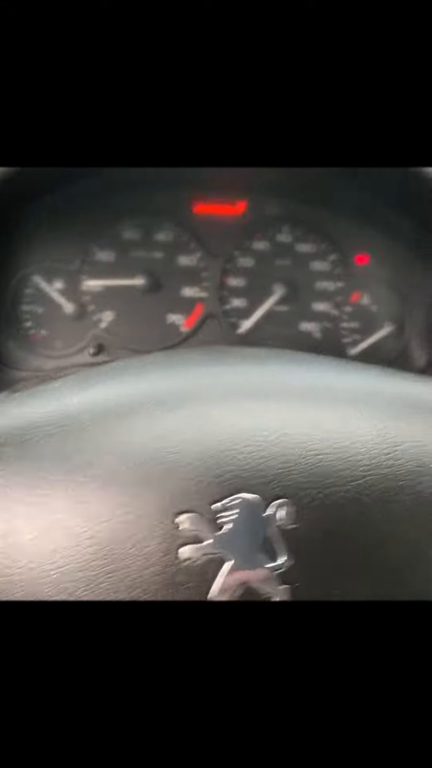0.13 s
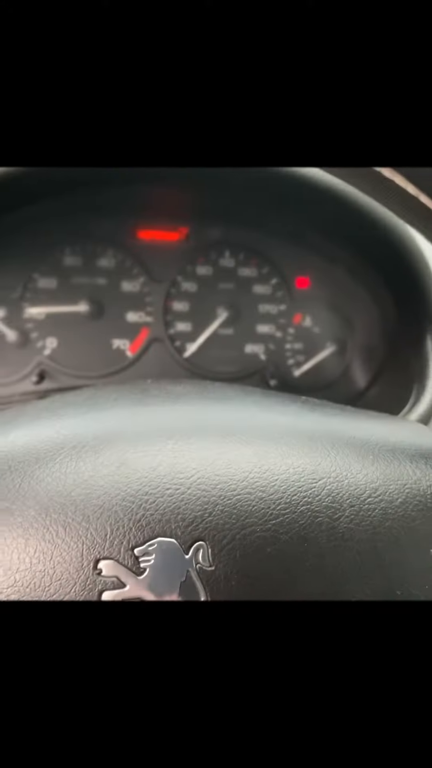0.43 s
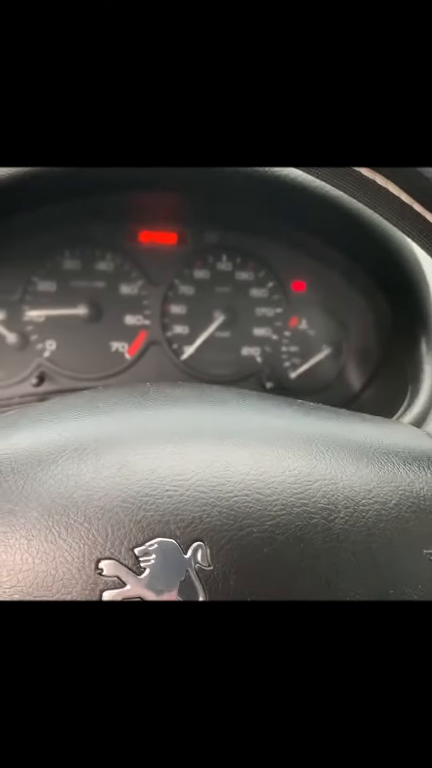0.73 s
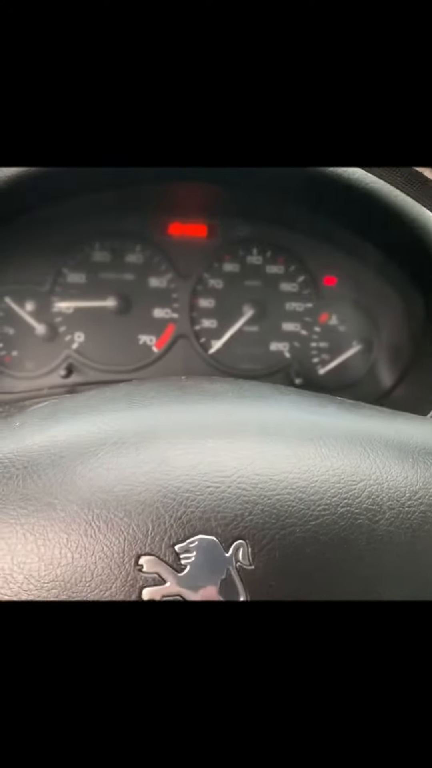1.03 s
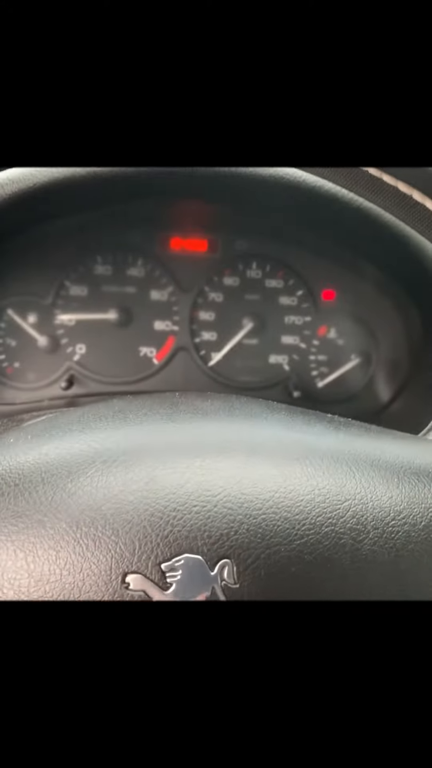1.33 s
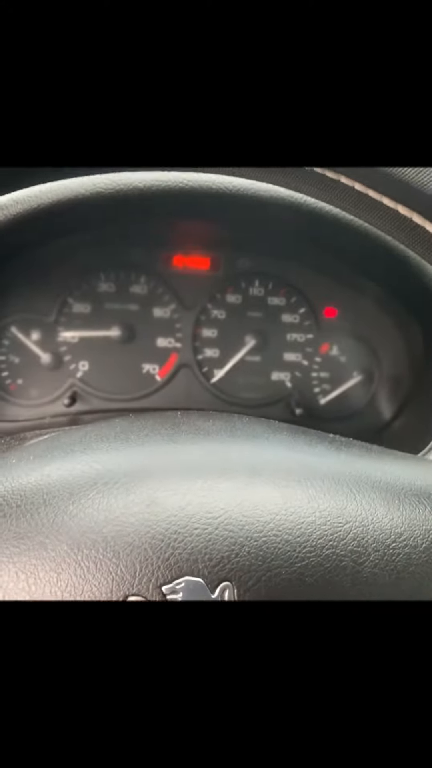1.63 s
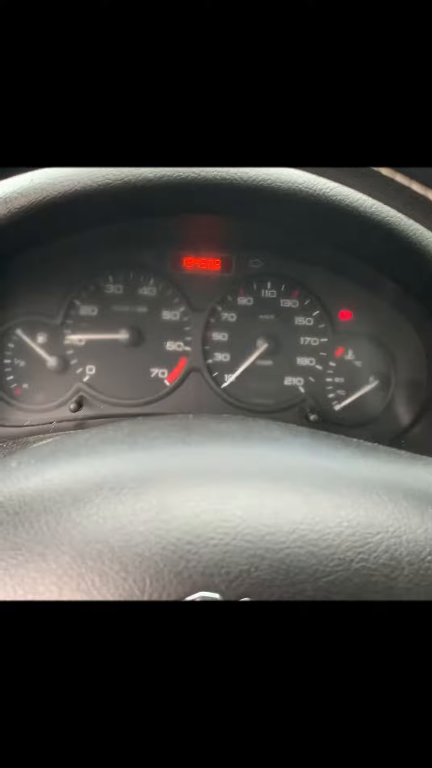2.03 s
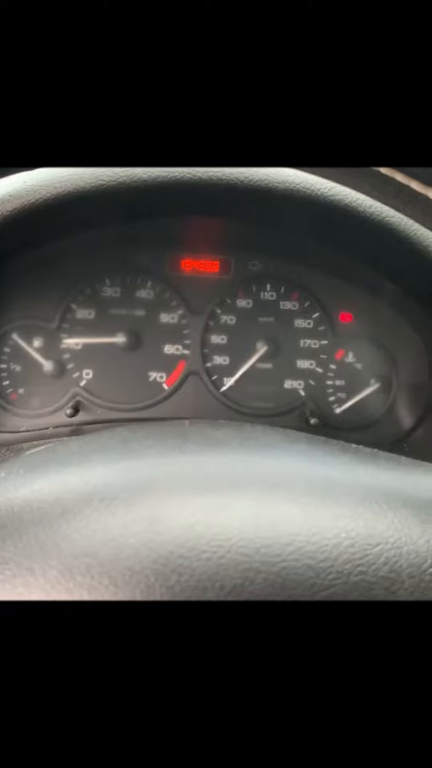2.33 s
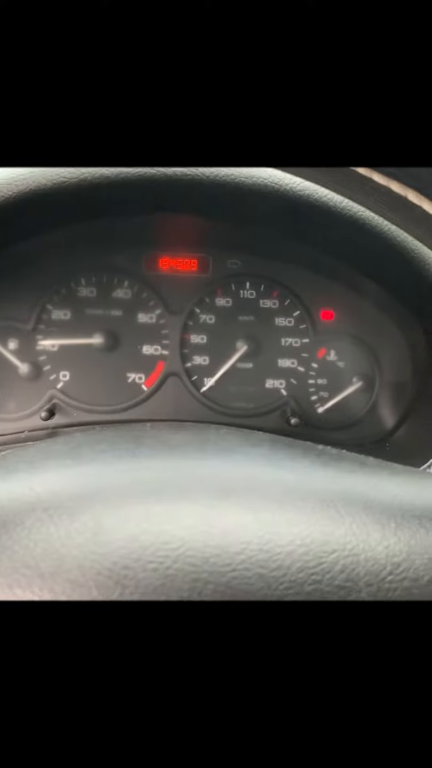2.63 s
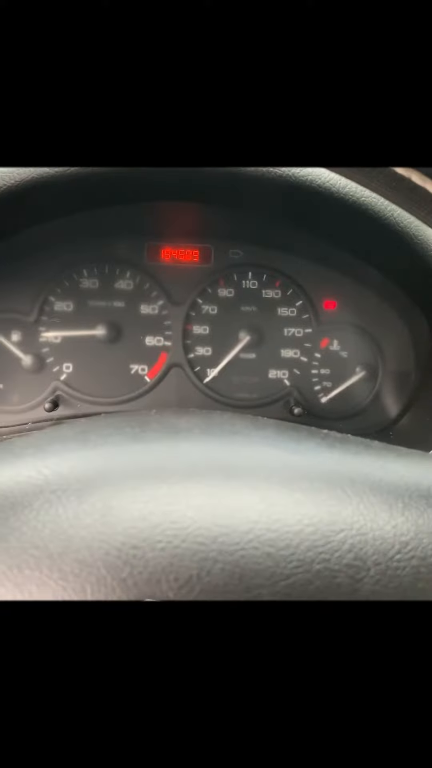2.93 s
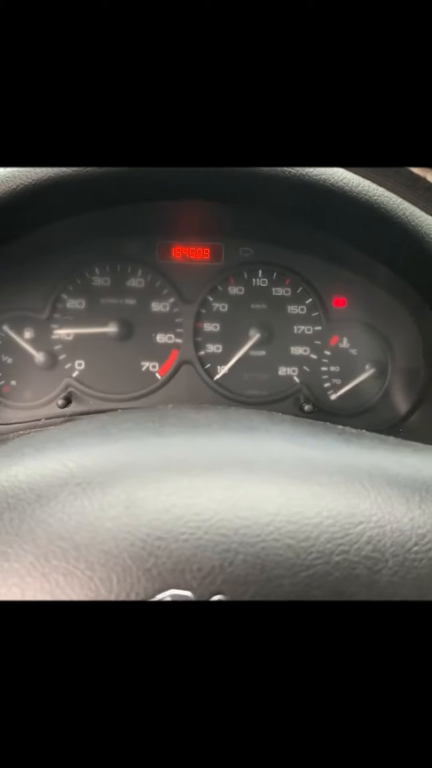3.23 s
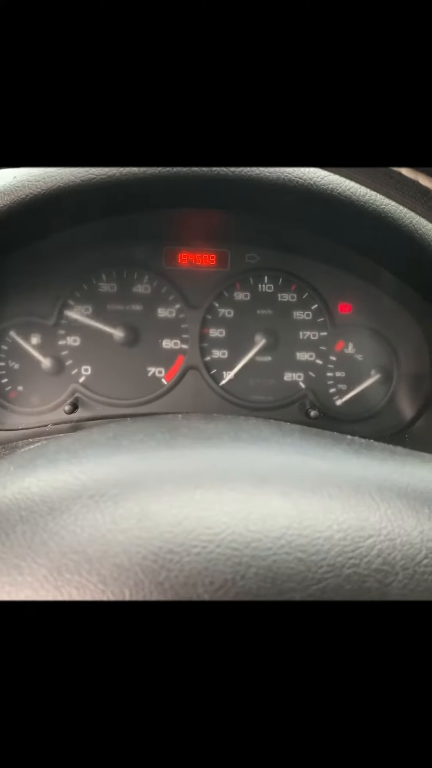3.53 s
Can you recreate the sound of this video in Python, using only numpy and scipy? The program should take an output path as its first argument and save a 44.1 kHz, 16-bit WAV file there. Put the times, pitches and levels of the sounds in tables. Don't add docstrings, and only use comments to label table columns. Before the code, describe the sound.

A car engine idles inside a closed cabin, a steady low hum with soft mechanical hiss and a thin, faint whine. A tiny sharp click comes at 0.45 s, a light tap at 1.1 s, and a dull pedal thump at 2.5 s, with small knocks and rubbing until 3.1 s. Then the revs leap, peaking around 3.4 s, and the much louder booming roar holds to the end at about 3.7 s.

```python
import sys
import numpy as np
from scipy import signal
from scipy.fft import rfft, irfft
from scipy.io import wavfile

SR = 44100
rng = np.random.default_rng(int(sys.argv[2]) if len(sys.argv) > 2 else 0)


def how_loud(loudness_db):
    steps = np.asarray(loudness_db, float) / 20
    return 10 ** steps


def unload_wav(signal):
    wavfile.write(
        sys.argv[1],
        SR,
        np.round(np.clip(np.atleast_2d(signal).T, -1, 1) * 32767).astype(np.int16),
    )


N = 161847
TIME_S = np.arange(N) / SR
MID_SIDE = np.array([[1], [-1]])


def rms_one(x):
    return x / np.sqrt(np.mean(x ** 2) + 1e-20)


def in_time(rows):
    time_s, *columns = np.transpose(rows)
    return [np.interp(TIME_S, time_s, column) for column in columns]


def at_hz(points, hz):
    table_hz, values = np.transpose(points)
    return np.interp(np.log(hz), np.log(table_hz), values)


def drift(rate_hz):
    r = np.exp(-80 * np.pi * rate_hz / SR)
    noise = rng.standard_normal(N // 40 + 2002)
    slow = signal.lfilter([1], [1, -2 * r, r * r], noise)[2000:]
    return np.interp(np.arange(N) / 40, np.arange(len(slow)), rms_one(slow))


def bump(at_s, length_s):
    return np.exp(-.5 * ((TIME_S - at_s) / length_s) ** 2)


def swells(rows):
    return sum(how_loud(db) * bump(at_s, length_s) for at_s, length_s, db in rows)


def resonate(x, hz, width_hz):
    r = np.exp(-np.pi * width_hz / SR)
    return signal.lfilter([(1 - r * r) / 2, 0, (r * r - 1) / 2],
                          [1, -2 * r * np.cos(2 * np.pi * hz / SR), r * r], x)


# (frequency [Hz], correlation [-1..1])
LIKENESS = [(60, 1), (200, 0.94), (400, 0.56), (900, 0.12), (2500, 0.21), (4000, 0.18), (6500, 1),
            (14000, 0.72)]
# (frequency [Hz], level [dB])
BALANCE = [(300, -0.5), (500, 1.5), (800, -3), (1300, -4), (1900, 1.5), (3000, -0.5)]
# (frequency [Hz], width [Hz], level [dB])
CABIN_MODES = [(640, 18, 3.5), (1254, 46, 6), (1460, 36, 3), (1726, 23, 4), (1820, 40, 0.5),
               (2000, 41, 6.5), (2140, 22, 1.5), (2290, 60, -4.5), (2690, 30, 3.5), (2925, 25, 7),
               (3040, 36, -2.5), (3390, 50, -4), (3450, 45, 4.5), (3590, 91, -2), (3840, 85, 3.5)]


def coloured(spectrum, patchy_db):
    hz = np.maximum(np.fft.rfftfreq(N, 1 / SR), 1)
    low_hz, high_hz = spectrum[0][0], spectrum[-1][0]
    alike = np.clip(at_hz(LIKENESS, hz), -1, 1)
    mid, side = rfft(rng.standard_normal((2, N)))
    both = np.sqrt(1 + alike) * mid + np.sqrt(1 - alike) * side * MID_SIDE
    both = both * how_loud(at_hz(spectrum, hz) + at_hz(BALANCE, hz) * MID_SIDE / 2)
    modes_db = sum(db / (1 + (2 * (hz - at) / width) ** 2) for at, width, db in CABIN_MODES)
    both = both * (hz > low_hz) * (hz < high_hz) * how_loud(modes_db)
    place = np.log(hz / low_hz) / np.log(high_hz / low_hz) * 7
    out = 0
    for k in range(8):
        band = both * np.clip(1 - abs(place - k), 0, 1)
        out = out + irfft(band, N) * how_loud(patchy_db * drift(15.5))
    return rms_one(out)


# (time [s], peak level [dB], frequency [Hz], t60 [s])
KNOCKS = [(.4495, -29, 12500, .002), (.45, -28, 13300, .002), (.4495, -31, 10000, .002),
          (.4495, -32, 7500, .002), (1.048, -33, 950, .03), (1.1, -20, 930, .026), (2.533, -9, 275, .06),
          (2.554, -24, 300, .05), (2.532, -33, 2300, .012), (2.915, -36, 1230, .05), (2.6, -38, 1480, .08),
          (2.59, -42, 2600, .03), (2.533, -26, 1300, .035), (2.531, -32, 1800, .025),
          (2.533, -26, 620, .04), (2.588, -36, 1500, .04), (2.577, -23, 220, .07), (2.546, -22, 200, .07),
          (2.9, -24, 330, .06), (2.895, -27, 200, .05), (2.9, -35, 1300, .04), (2.21, -28, 330, .06),
          (3.14, -28, 430, .06), (2.805, -26, 230, .06), (2.605, -27, 170, .07)]


def knocks():
    out = np.zeros(N)
    for at_s, db, hz, t60_s in KNOCKS:
        start = int(at_s * SR)
        t = np.arange(int(t60_s * 1.5 * SR)) / SR
        ring = np.sin(2 * np.pi * hz * t)
        ring += .5 * np.sin(2 * np.pi * hz * .83 * t)
        ring += .3 * np.sin(2 * np.pi * hz * 1.12 * t)
        attack = np.clip(t / (1.5 / hz), 0, 1)
        out[start:start + len(t)] += .6 * how_loud(db - 60 * t / t60_s) * attack * ring
    return out


# (time [s], length [s], level
# [dB])
RUBS = [(2.17, .13, -64), (2.56, .03, -65), (2.91, .012, -63), (3.08, .014, -60), (.47, .02, -70),
        (3.19, .04, -58)]


def rubs():
    spectrum = [(3380, 0), (6500, 0), (9500, -5), (12000, -6), (13100, -10)]
    return coloured(spectrum, patchy_db=1.0) * swells(RUBS)


# (time [s], length [s], level [dB])
SHIFTS = [(0.22, 0.24, -44), (2.114, 0.15, -45.5), (2.89, 0.073, -45), (3.4, 0.01, -42), (3.2, 0.041, -38)]


def shifts():
    return coloured([(130, 10.0), (330, -4.0), (700, -11.5)], patchy_db=4.5) * swells(SHIFTS)


# (time [s], frequency [Hz], level [dB])
WHINE = [(0.0, 1090, -42.5), (0.02, 1103, -64), (0.37, 1128, -54.5), (0.99, 1107, -60.5), (1.02, 1114, -55),
         (1.7, 1118, -58), (2.1, 1115, -51.5), (2.5, 1115, -48.5), (2.72, 1112, -55.5), (2.95, 1106, -57.5),
         (3.07, 1110, -56), (3.12, 1120, -53)]


def alternator():
    hz, db = in_time(WHINE)
    turn = 2 * np.pi * np.cumsum(np.clip(hz, 1105, 1122)) / SR
    fade_s = .04
    fade = np.clip((WHINE[-1][0] - TIME_S) / fade_s + 1, 0, 1)
    tone = how_loud(db + 0.92 * drift(8.7)) * np.cos(turn + .5 * drift(10.0))
    third = how_loud(-53 + 1.4 * drift(3.6)) * np.cos(turn / 3 + 0.4 * drift(27.0))
    return np.sqrt(2) * fade * (tone * how_loud([[-4.0], [2.5]]) + third)


# (frequency [Hz], density [dB/Hz])
RUMBLE = [(24, -28), (34, -10), (58, 0), (100, -4), (135, -8), (165, -16), (205, -9), (270, -20)]


def rumble(revs):
    return how_loud(-39.5 + 3.0 * revs) * coloured(RUMBLE, patchy_db=1.5)


# (frequency [Hz], density [dB/Hz])
IDLE_NOISE = [(230, 0.5), (370, -2), (520, -10.5), (750, -8.5), (1300, -13.5), (2200, -19), (3000, -20),
              (5000, -30.5)]


def idle_hiss(noise_db, revs):
    swell_db = .5 * (noise_db - np.median(noise_db)) * (2 - revs)
    return how_loud(-44 + swell_db) * coloured(IDLE_NOISE, patchy_db=1.5)


# (frequency [Hz], density [dB/Hz])
REV_NOISE = [(250, -5), (330, -10), (560, -21), (1000, -19), (1900, -9), (3000, -10), (4200, -12),
             (5500, -24.5)]
# (frequency [Hz], width [Hz], level [dB])
PANELS = [(207.4, 7.6, -44), (656, 64, -61), (882, 24, -53.5), (1235, 28, -48.5), (1422, 54, -55),
          (1686, 50, -53), (1820, 55, -52), (1885, 50, -54), (2030, 40, -56.5), (2790, 93, -58)]


def loaded_noise(turn, load):
    out = how_loud(-39) * coloured(REV_NOISE, patchy_db=.9)
    revved = slice(-(SR // 4), None)
    pulses = np.diff(np.floor(turn / (2 * np.pi)), prepend=0)
    pulses = pulses * how_loud(3.0 * rng.standard_normal(N)) * load
    pulses *= how_loud(-1.5) / pulses[revved].std()
    for hz, width_hz, db in PANELS:
        drive = rng.standard_normal((2, N))
        drive[0] += pulses
        mid, side = resonate(resonate(drive, hz, width_hz), hz, width_hz)
        pair = mid + min(.9, hz / 1200) * side * MID_SIDE
        out += how_loud(db + 2.2 * drift(7.4)) * pair / mid[revved].std()
    return load * out


def intake():
    on_s, off_s, rise_s, fall_s = 3.135, 3.34, 0.019, 0.13
    throttle = np.clip((TIME_S - on_s) / rise_s, 0, 1) * np.clip((off_s - TIME_S) / fall_s + 1, 0, 1)
    roar = coloured([(120, 0), (300, -3), (600, -10), (1100, -22)], patchy_db=1.0)
    pipe_hz = 635
    pipe = resonate(resonate(rng.standard_normal(N), pipe_hz, 30), pipe_hz, 33)
    return throttle * (how_loud(-38) * roar + how_loud(-50) * rms_one(pipe))


# (frequency [Hz], density [dB/Hz])
AIR = [(4000, -26), (5200, 7.5), (6900, -3), (8800, -9.5), (10800, -11), (13300, -12), (14400, -20),
       (15000, -35.5)]


def air_hiss(noise_db):
    return how_loud(0.87 * (noise_db + 60) - 60 - 7) * coloured(AIR, patchy_db=.5)


def machinery(turn, noise_db, revs):
    load = how_loud(noise_db - noise_db.max()) * np.clip(20 * revs, 0, 1)
    chuff = 1 + 0.049 * np.cos(turn)
    hiss = idle_hiss(noise_db, revs) + loaded_noise(turn, load) + intake() + air_hiss(noise_db)
    return chuff * hiss + rumble(revs)


# (time [s], frequency [Hz], level [dB], length [s])
SHUDDERS = [(3.43, 55, -14, .016), (2.585, 58, -27, .025), (2.87, 108, -34, .09), (3.275, 218, -29, .04),
            (3.52, 346, -34, .06), (3.27, 355, -34, .03), (3.64, 48, -28, .025), (3.349, 72, -13, .015),
            (3.475, 59, -25, .02), (3.375, 315, -34, .03), (3.35, 275, -35, .02), (3.48, 272, -34, .025),
            (3.5, 133, -33, .03), (3.16, 192, -34, .015), (3.64, 324, -37, .02), (.35, 94, -41, .35),
            (2.86, 60, -30, .03), (.54, 200, -41, .05), (2.89, 138, -39, .06), (3.55, 44, -31, .04),
            (3.29, 445, -38, .025)]


def shudders():
    out = np.zeros(N)
    for at_s, hz, db, length_s in SHUDDERS:
        out -= how_loud(db) * bump(at_s, length_s) * np.cos(2 * np.pi * hz * (TIME_S - at_s))
    return out


# (multiple of firing rate, idle level [dB], revved level [dB])
UNEVEN = [(.5, -72, -43), (1.25, -48, -50), (1.5, -39.5, -50), (1.75, -50, -52), (2.5, -48, -46),
          (2.75, -52, -47), (3.0, -49, -44), (3.5, -57, -48), (5.0, -57, -56), (11.0, -59, -62)]


def boom(turn, first_db, second_db, revs):
    wobble_db, wobble_hz = .6, 9.0
    second_lead = .75 + .4 * TIME_S
    out = how_loud(first_db + wobble_db * drift(wobble_hz)) * np.cos(turn)
    out += how_loud(second_db + 1.8 * wobble_db * drift(wobble_hz)) * np.cos(2 * turn + second_lead)
    for order, idle_db, rev_db in UNEVEN:
        level_db = idle_db + (rev_db - idle_db) * revs + 2.0 * drift(4.0)
        out += how_loud(level_db) * np.cos(order * turn + .8 * drift(2.5))
    return np.sqrt(2) * out


# (time [s], firing rate [Hz], boom at firing rate [dB], boom at twice that [dB],
# mechanical noise [dB])
ENGINE = [(0.0, 37.35, -27, -33, -61.9), (0.07, 37.351, -29.5, -31.5, -62.1),
          (3.01, 37.01, -29, -31.2, -62.4), (3.13, 37.2, -31, -27, -59), (3.17, 41.54, -21, -18, -53),
          (3.2, 48, -18, -25, -52), (3.24, 60, -14, -24, -48.5), (3.27, 71, -35, -27, -44.5),
          (3.29, 80, -24, -30, -44), (3.31, 85, -13, -32, -40), (3.34, 89.7, -17, -35, -37.5),
          (3.37, 99.4, -23, -35, -39.5), (3.39, 103, -21, -33, -38.5), (3.42, 104.5, -24, -34, -42),
          (3.5, 102, -26, -33, -40), (3.58, 98.6, -22, -29, -41), (3.64, 97.1, -21, -41, -40),
          (3.67, 97, -24, -40, -42.5)]


def scene():
    hz, first_db, second_db, noise_db = in_time(ENGINE)
    turn = 2 * np.pi * np.cumsum(hz) / SR - 1.2
    idle_hz, revved_hz = 37.5, 100
    revs = np.clip((hz - idle_hz - 1) / (revved_hz - idle_hz), 0, 1)
    driver = knocks() + rubs() + shifts()
    engine = machinery(turn, noise_db, revs) + shudders() + boom(turn, first_db, second_db, revs)
    return driver + alternator() + engine


def top_cut(x):
    return signal.sosfilt(signal.butter(12, 14360, fs=SR, output="sos"), x)


# (frequency [Hz], phase [rad])
PORT_PHASE = [(500, 0), (2070, .6), (3360, 1.9), (4740, 2.9), (6900, 2 * np.pi), (9700, 3 * np.pi),
              (12500, 4 * np.pi), (14300, 5 * np.pi)]
# (frequency [Hz], phase [rad])
BASS_PHASE_EARLY = [(85, 0), (150, -.9), (265, -np.pi), (400, -5.2), (500, -2 * np.pi)]
# (frequency [Hz], phase [rad])
BASS_PHASE_LATE = [(20, .7), (42, .55), (90, -.2), (200, -.55), (330, -.1), (500, 0)]
# (frequency [Hz], level [dB])
BASS_BALANCE_LATE = [(40, 3), (90, -2.5), (180, 0), (350, -3), (450, 0.5)]


def record(dry):
    pad = SR // 10
    hz = np.maximum(np.fft.rfftfreq(N + 2 * pad, 1 / SR), 1)

    def lead(table):
        return np.exp(1j * np.interp(hz, *np.transpose(table)))

    def to_time(spectrum):
        return irfft(spectrum, N + 2 * pad)[pad:-pad]

    left = rfft(np.pad(dry[0], pad, "reflect")) * lead(PORT_PHASE)
    early = to_time(left * lead(BASS_PHASE_EARLY))
    late = to_time(left * lead(BASS_PHASE_LATE) * how_loud(at_hz(BASS_BALANCE_LATE, hz)))
    from_s, to_s = 1.5, 2.25
    settled = np.clip((TIME_S - from_s) / (to_s - from_s), 0, 1)
    mix = np.array([early + settled * (late - early), dry[1]])
    return top_cut(mix)


dry = scene()
out = record(dry)
unload_wav(out)
```